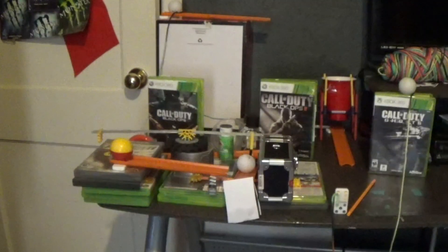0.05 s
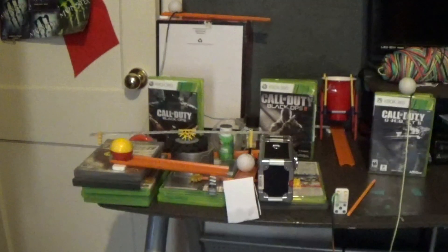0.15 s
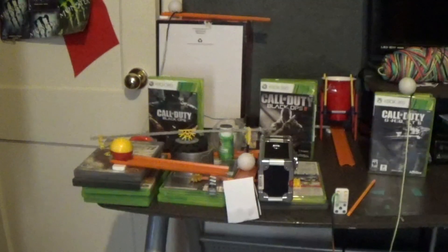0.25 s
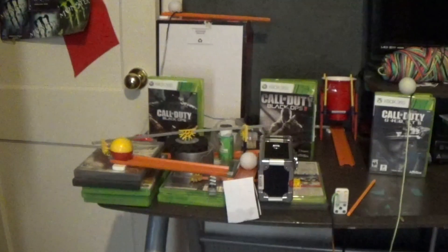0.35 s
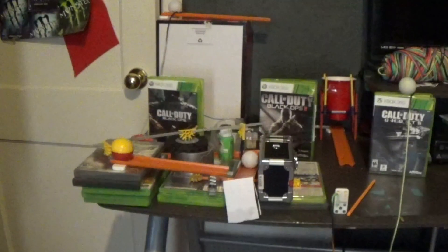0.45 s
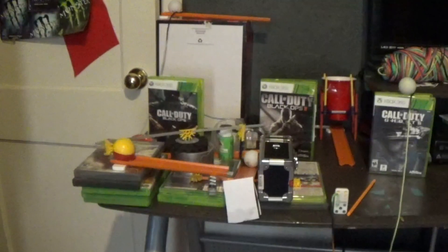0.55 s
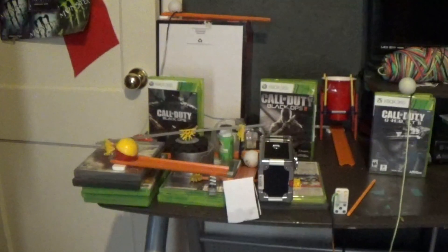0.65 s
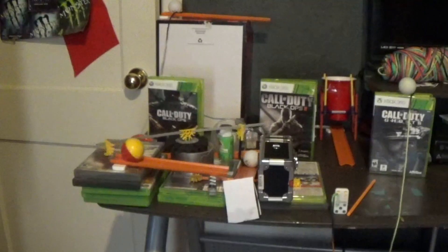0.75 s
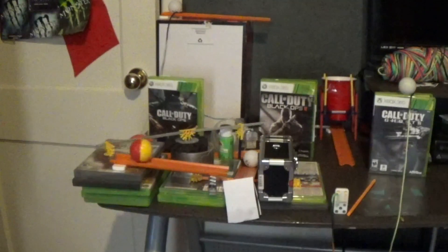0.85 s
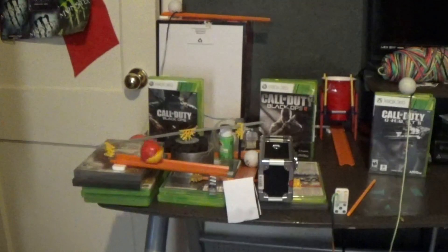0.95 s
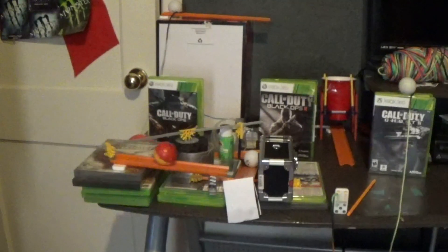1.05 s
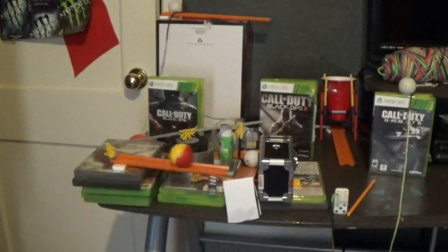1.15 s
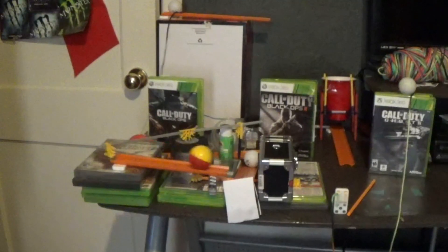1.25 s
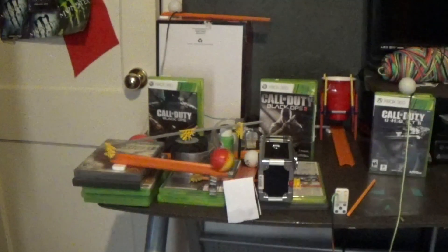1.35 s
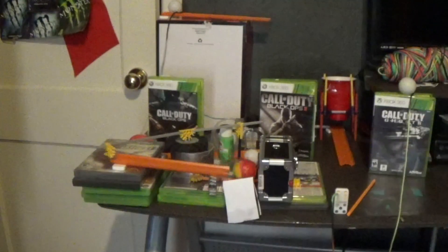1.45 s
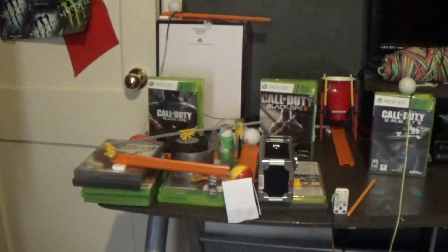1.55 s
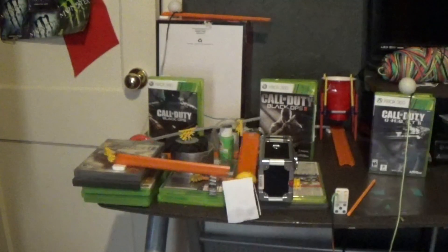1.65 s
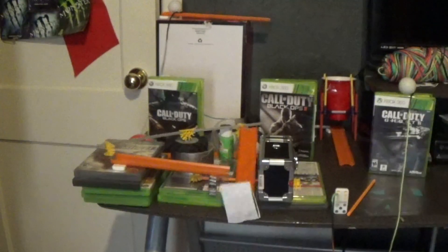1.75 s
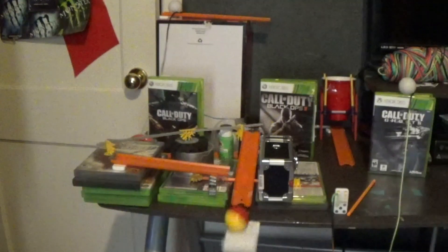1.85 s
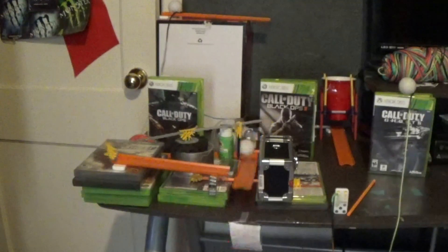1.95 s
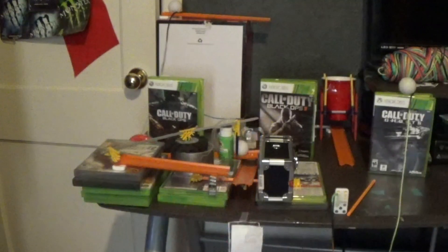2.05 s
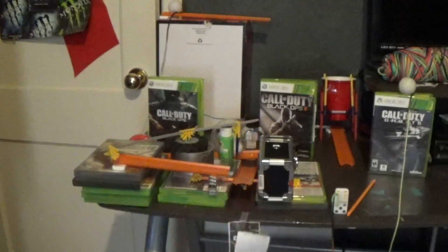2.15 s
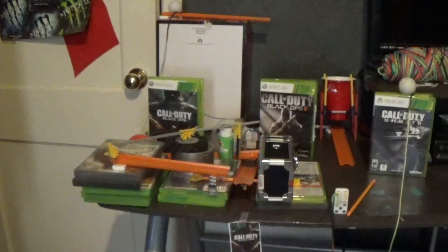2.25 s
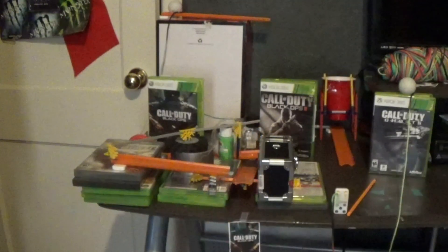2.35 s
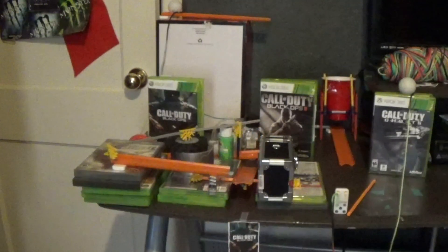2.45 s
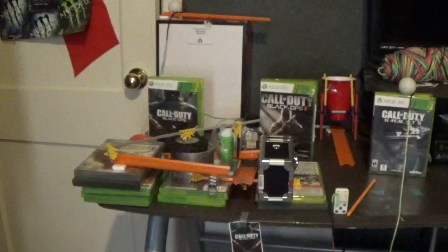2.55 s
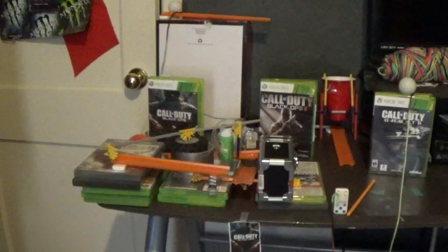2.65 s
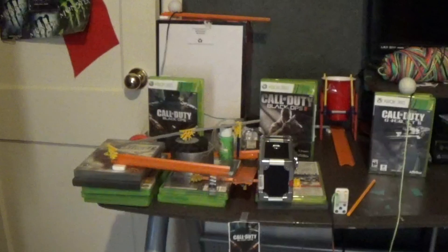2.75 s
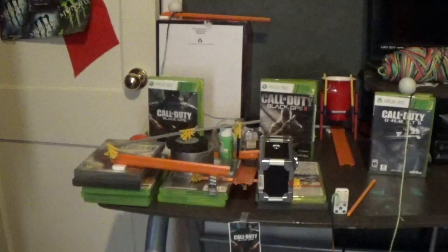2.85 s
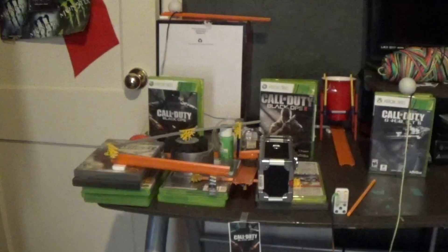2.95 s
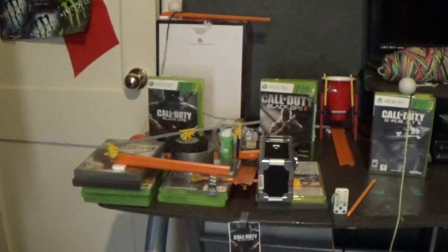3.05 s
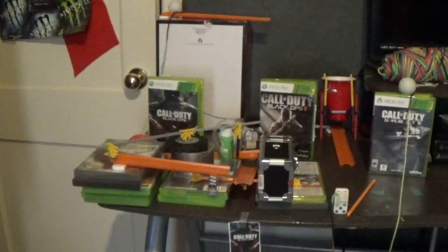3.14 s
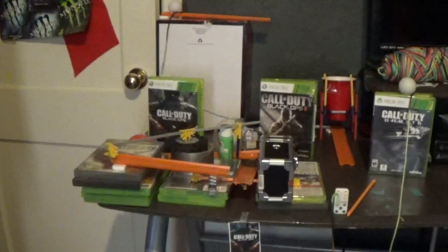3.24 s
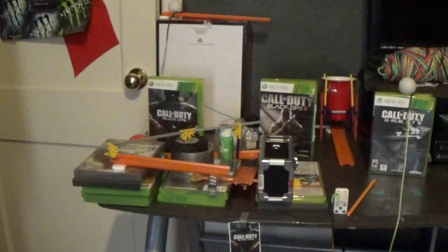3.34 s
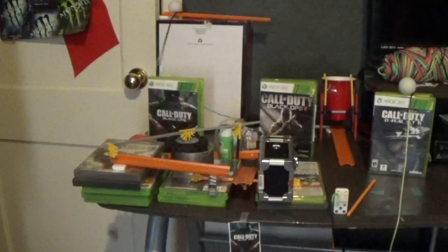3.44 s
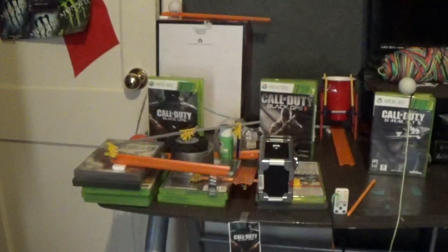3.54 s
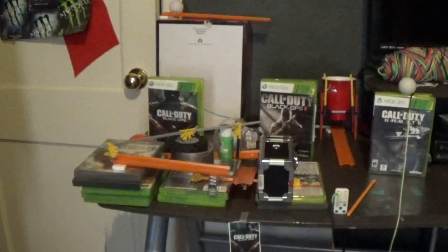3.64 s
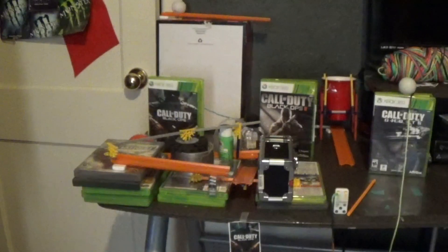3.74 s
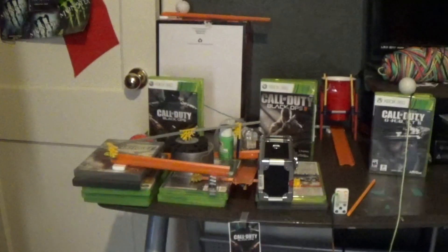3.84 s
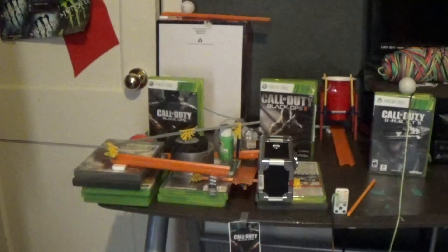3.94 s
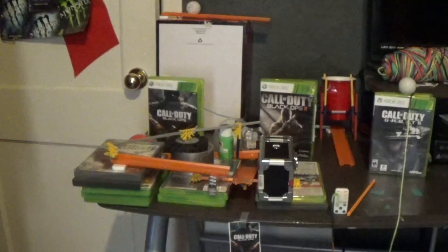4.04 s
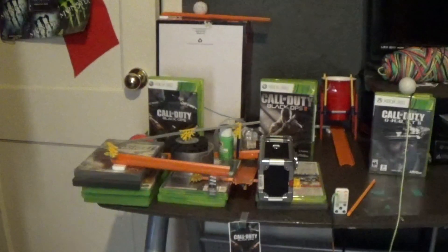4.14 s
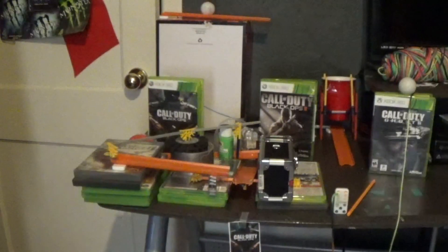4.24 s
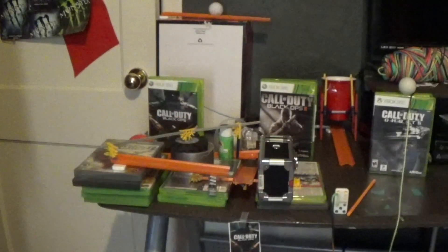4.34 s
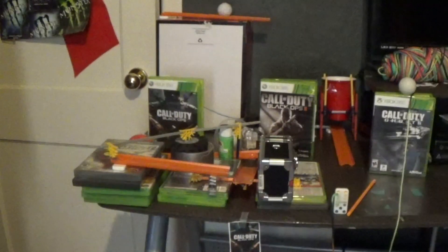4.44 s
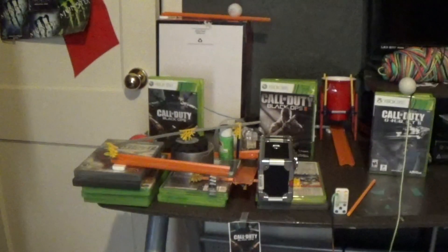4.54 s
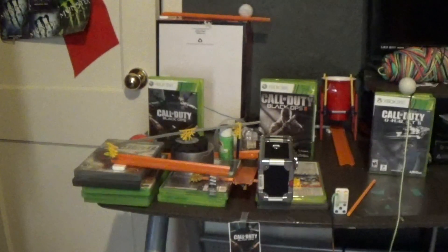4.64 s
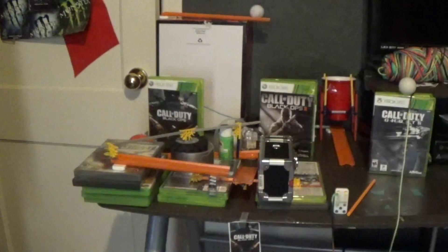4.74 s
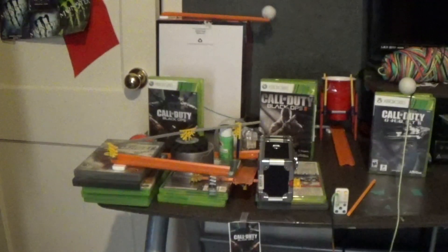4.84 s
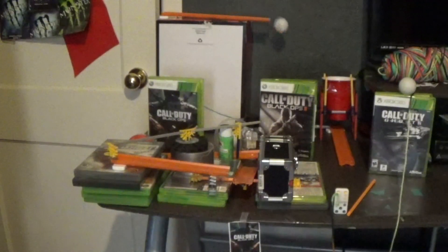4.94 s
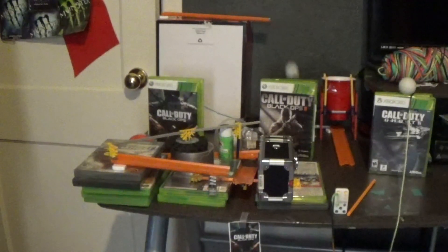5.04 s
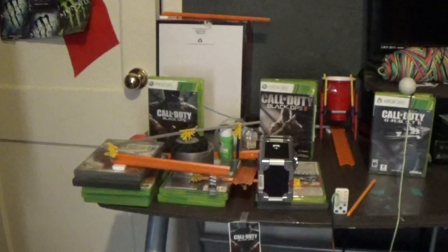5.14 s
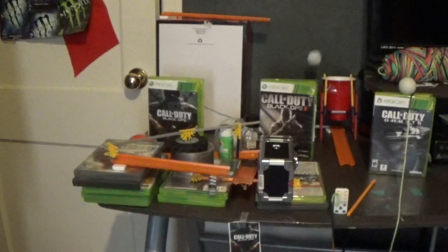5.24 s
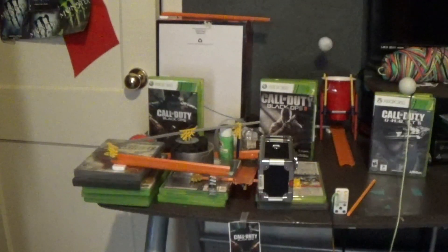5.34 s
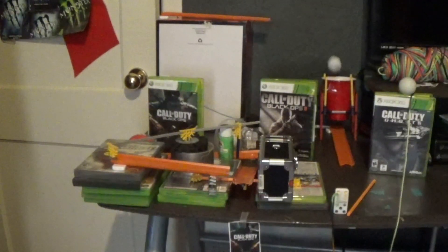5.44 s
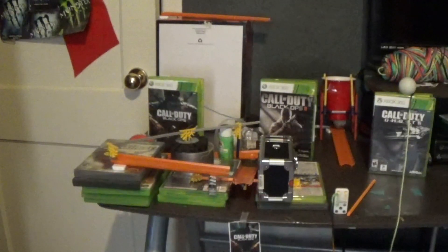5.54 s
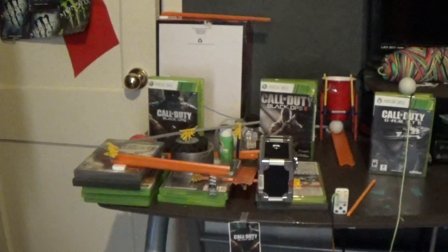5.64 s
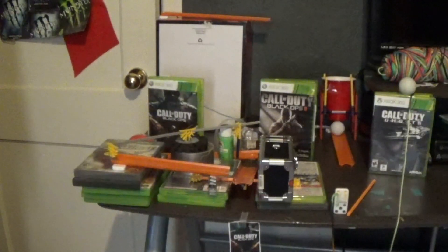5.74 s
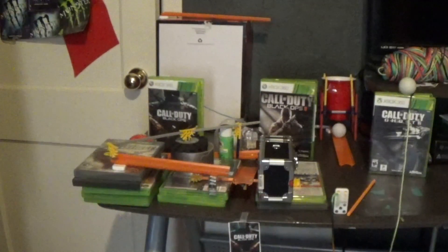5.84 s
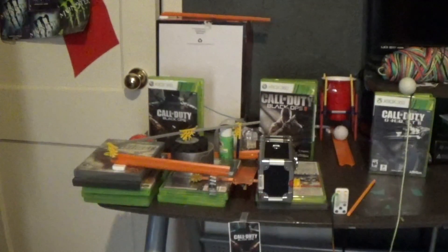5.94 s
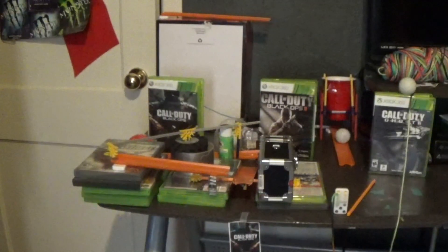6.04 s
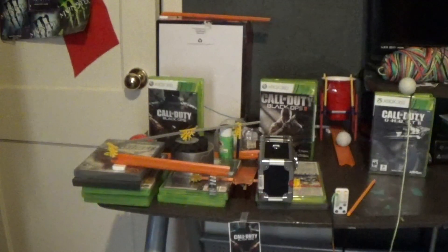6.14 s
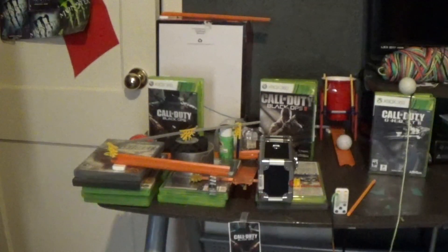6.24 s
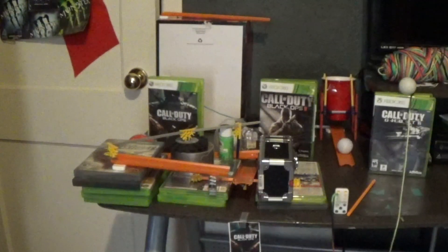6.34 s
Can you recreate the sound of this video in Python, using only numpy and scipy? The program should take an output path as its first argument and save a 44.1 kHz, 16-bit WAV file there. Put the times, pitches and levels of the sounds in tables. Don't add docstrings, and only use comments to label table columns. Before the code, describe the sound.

Heard by a small stereo camera a little way off, with short room echoes: tiny rolling clicks, a bright tick, then a dense clatter of balls and toppling plastic track. A flat case hits the floor with a boxy smack and two softer bounces. A quiet hollow rattle speeds up and fades before a dull weight drop. After a long lull, a light ball raps inside a cup and lands on plastic, over low fan noise.

```python
import sys
import numpy as np
from scipy import signal
from scipy.fft import rfft, irfft, next_fast_len
from scipy.io import wavfile
from scipy.ndimage import uniform_filter1d

SR = 44100
rng = np.random.default_rng(int(sys.argv[2]) if len(sys.argv) > 2 else 0)


def log_audio(samples):
    frames = np.atleast_2d(samples).T
    limited = np.clip(frames, -1, 1)
    pcm = np.round(limited * 32767).astype(np.int16)
    wavfile.write(sys.argv[1], SR, pcm)


def volts_from_db(level):
    exponent = np.asarray(level, float) / 20
    return 10 ** exponent


N = 281799

# start in seconds, peak level in dB, ringing spot in Hz, tilt in dB per octave.
ROD_BLOWS = [
    (0.4372, -14.5, 5760, 6.5),
    (0.4400, -24, 4680, 0),
    (0.4570, -25, 5500, -1.5),
]
# start in seconds, peak in dB, tilt in dB per octave.
ROLL_BLOWS = [(0.0359, -40.5, -5), (0.0818, -46, 2), (0.11, -47, 7), (0.141, -47, 6), (0.161, -41.5, 14),
              (0.199, -47, 3), (0.2244, -44, 7), (0.246, -54, 1), (0.2748, -37, 15), (0.288, -40.5, 18),
              (0.308, -46, 2), (0.354, -47, 8)]
# start in seconds, peak in dB, ringing spot in Hz, tilt in dB per octave.
STOP_BLOWS = [
    (0.5805, -24, 9100, 1),
    (0.5994, -43, 4100, -1),
    (0.6439, -43, 9130, 0),
]
# start in seconds, peak in dB, ringing spot in Hz, tilt in dB per octave.
BUMP_BLOWS = [
    (1.473, -3, 8800, -4),
    (1.4794, -24, 7900, -11),
    (1.5469, -16, 2550, -6),
    (1.5577, -17, 5270, 1),
    (1.5875, -18, 2300, -8),
    (1.4765, -7, 5700, -2),
    (1.6015, -24, 9500, -4),
    (1.648, -34, 9800, -7),
]
# start in seconds, peak in dB, ringing spot in Hz, tilt in dB per octave.
KNOCK_BLOWS = [
    (1.4915, -13, 1110, 0.5),
    (1.4945, -10.5, 1410, -0.5),
    (1.828, -17, 1150, -1.5),
    (1.8298, -14.5, 1340, -2),
    (1.8375, -19, 1480, -2),
    (1.846, -19, 940, -2),
    (1.852, -18, 800, -1),
    (1.866, -24, 900, -2),
]
# start in seconds, peak in dB, ringing spot in Hz, tilt in dB per octave.
TRACK_BLOWS = [(1.6045, -15, 1630, 2), (1.6125, -25, 2700, 4), (1.62, -27, 3000, 0),
               (1.629, -22, 2500, 2.5), (1.6384, -19.5, 980, 0), (1.716, -23, 3900, -0.5),
               (1.733, -17, 2260, 3), (1.6857, -18.5, 8900, 6.5), (1.698, -4, 4300, 8.5),
               (1.7055, -15.5, 3320, -0.5), (1.723, -18.5, 4020, -4.5), (1.7385, -21, 3900, 2),
               (1.7605, -22.5, 1810, -1), (1.916, -29, 3970, 1), (1.925, -25.5, 2310, 0),
               (1.94, -40, 3500, -7), (1.9583, -28, 1970, 12)]
# start in seconds, peak in dB, spot in Hz, tilt in dB per octave.
TICK_BLOWS = [(1.7045, -12, 9000, 1), (1.711, -18, 9000, 1), (1.761, -19, 8800, -1.5),
              (1.770, -32, 9500, 3), (1.821, -32, 9800, 0), (1.8265, -29, 5000, -3), (1.831, -30, 8800, -1),
              (1.889, -32, 9600, 3), (2.003, -26, 9800, 4), (2.0145, -27, 9200, 2), (2.029, -24, 9500, 4),
              (2.048, -30, 9300, 4), (2.133, -27, 4600, -6), (2.154, -37, 9500, -1)]
# start in seconds, peak in dB, ringing spot in Hz, tilt in dB per octave.
FLAP_BLOWS = [
    (1.9992, -4.5, 4340, 5),
    (2.0018, -14.5, 1780, -0.5),
    (2.0135, -20, 2300, 0),
    (2.029, -21, 2010, 0),
    (2.0965, -22, 3900, -1.5),
    (2.0914, -17.5, 4050, 5.5),
    (2.1315, -36, 1620, 4),
    (2.145, -32, 1730, -2),
]
# start in seconds, peak in dB, ringing spot in Hz, tilt in dB per octave.
CASE_BLOWS = [(2.244, -5.5, 407, -1), (2.253, -8.5, 418, -2.5), (2.2595, -5, 660, -2),
              (2.2625, -11, 710, 3.5), (2.267, -10, 724, 0.5), (2.275, -17, 730, -2.5),
              (2.2855, -12, 460, -0.5), (2.2975, -11.5, 630, -4), (2.315, -21, 607, -2),
              (2.328, -29, 500, 4), (2.3475, -19.5, 544, -1)]
# start in seconds, peak in dB, ringing spot in Hz, tilt in dB per octave.
CORNER_BLOWS = [
    (2.2418, -18, 5000, -5.5),
    (2.2434, -3, 3500, -3),
]
# start in seconds, peak in dB, ringing spot in Hz, tilt in dB per octave.
BOUNCE_BLOWS = [
    (2.6015, -15, 295, 3.5),
    (2.603, -16.5, 305, -4.5),
    (2.612, -20.5, 404, 2.5),
    (2.7925, -22, 296, 3),
]
# start in seconds, peak in dB, ringing spot in Hz.
RATTLE_BLOWS = [(3.052, -58, 1330), (3.109, -31.5, 1190), (3.150, -33.5, 1150), (3.165, -43, 1120),
                (3.2035, -30, 1130), (3.243, -30.5, 1160), (3.259, -42, 1120), (3.278, -33, 1090),
                (3.312, -33, 1780), (3.339, -35.5, 1120), (3.3662, -36.5, 1700), (3.391, -37, 1800),
                (3.411, -38, 1150), (3.43, -38, 1150), (3.448, -39.5, 1140), (3.464, -48, 1120),
                (3.478, -51, 1150)]
# start in seconds, peak in dB, ringing spot in Hz, tilt in dB per octave.
WEIGHT_BLOWS = [
    (3.6862, -4.5, 498, 5),
    (3.6875, -10.5, 520, 0),
    (3.699, -19, 546, -0.5),
    (3.722, -19, 600, 3.5),
    (3.759, -32, 670, -6),
    (3.958, -27, 393, 5.5),
]
# start in seconds, peak in dB, ringing spot in Hz, tilt in dB per octave.
CUP_BLOWS = [
    (5.1577, -8, 3140, 2.5),
    (5.1595, -3.5, 580, 0.5),
    (5.1625, -21, 8700, 1),
    (5.1653, -1.5, 8600, 3.5),
    (5.1715, -12.5, 8300, -1),
    (5.179, -12, 1090, 3),
    (5.192, -5.5, 1500, 0),
    (5.196, -27, 1310, -1.5),
    (5.2035, -20, 3500, -0.5),
]
# start in seconds, peak in dB, ringing spot in Hz, tilt in dB per octave.
RIM_BLOWS = [
    (5.5521, -22.5, 4330, 4.5),
    (5.5864, -25.5, 10100, 10),
    (5.5885, -26, 3670, 2),
    (5.593, -31, 6900, 8),
]
# start in seconds, peak in dB, ringing spot in Hz, tilt in dB per octave.
RAMP_BLOWS = [(5.6008, -6, 3500, 3), (5.6032, -10, 3150, 1), (5.6075, -19, 3330, 3),
              (5.6135, -9, 1500, 1.5), (5.6185, -14, 1510, -0.5), (5.6245, -10.5, 3700, 0),
              (5.628, -10.5, 8800, 2), (5.6394, -13.5, 3720, 0.5), (5.65, -12.5, 3250, 0.5),
              (5.676, -21, 3000, -2.5), (5.6604, -15, 3500, -2.5)]

# frequency in Hz, density in dB per Hz.
ROD_COLOUR = [(180, -53), (300, -28), (624, -22), (705, -16), (886, -2), (2280, -7), (2700, -2),
              (4820, 0.5), (10200, -10), (11500, -15), (15000, -55), (22000, -120)]
ROLL_COLOUR = [(590, -33), (1000, -10), (1360, 2), (3370, -3), (4060, 2), (7720, -8), (9000, -2.5),
               (10700, 1), (11500, 0), (15000, -53), (22000, -120)]
BUMP_COLOUR = [(180, -54.5), (300, -36), (4010, -3), (4400, 1), (5050, -4.5), (5880, 0), (7060, -2.5),
               (9430, 1), (11500, -5.5), (15000, -41), (22000, -120)]
KNOCK_COLOUR = [(59, -57), (100, -31.5), (686, -3.5), (853, -8), (924, -5.5), (1900, -12.5), (2700, -27),
                (9620, -47), (10800, -46), (11500, -65), (15000, -97), (22000, -120)]
TRACK_COLOUR = [(120, -47), (200, -11), (381, 5), (1150, 6), (2770, 5), (3950, 3.5), (6570, -10.5),
                (9070, -8.5), (10900, -14), (11500, -20), (15000, -89), (22000, -120)]
FLAP_COLOUR = [(120, -51), (200, -8), (401, -1), (475, -4.5), (1090, 6), (1270, -7), (1380, 4.5),
               (4160, -5.5), (7530, -16), (9540, -17.5), (11500, -17), (15000, -61), (22000, -120)]
CASE_COLOUR = [(18, -67), (30, -37), (155, -13), (231, 0.5), (344, 1.5), (657, -0.5), (931, -4.5),
               (1080, -18), (1820, -18), (2930, -16.5), (5060, -21), (9420, -43), (11500, -56),
               (15000, -88), (22000, -120)]
BOUNCE_COLOUR = [(18, -67), (30, -33), (148, -19.5), (225, 2.5), (399, -2), (595, -14.5), (760, -21.5),
                 (1250, -21.5), (3000, -33), (9190, -69.5), (11500, -68), (15000, -85), (22000, -120)]
RATTLE_COLOUR = [(120, -59), (200, -18), (225, -12), (262, -4), (1130, 7.5), (2300, -12.5), (2910, -12),
                 (6570, -25), (10400, -15), (11500, -11), (15000, -73), (22000, -120)]
WEIGHT_COLOUR = [(18, -78), (30, -40), (110, -30), (243, -7), (335, 1.5), (674, -3.5), (908, -7.5),
                 (1110, -15.5), (1350, -16), (3070, -25), (3660, -29.5), (9900, -48.5), (11500, -53),
                 (15000, -73), (22000, -120)]
CUP_COLOUR = [(59, -70.5), (100, -25), (230, -25), (310, -7), (371, -15.5), (597, -11), (1680, -6.5),
              (2540, -19.5), (3430, -19.5), (5970, -34), (8540, -22), (10400, -14.5), (11500, -47),
              (15000, -87), (22000, -120)]
RIM_COLOUR = [(180, -35), (300, 2), (1730, -5), (2110, -13), (2700, -1), (4400, -3.5), (5120, -8),
              (10300, -14.5), (11500, -25), (15000, -59), (22000, -120)]
RAMP_COLOUR = [(59, -61), (100, -31), (609, -6), (804, -11.5), (1490, -6), (2440, -7), (3780, -3),
               (7280, -17.5), (8540, -7.5), (10200, -12), (11500, -16), (15000, -83), (22000, -120)]

# frequency in Hz, width in Hz, lift in dB.
ROD_SHELL = [(2850, 300, 4), (4780, 60, 10)]
ROLL_SHELL = [(8900, 420, 7), (10200, 330, 7.2)]
CASE_SHELL = [(242, 18, 5.1), (492, 29, 4.3), (660, 22, 1.5), (870, 50, 1.8), (1150, 150, 2)]
BALL_SHELL = [(1150, 88, 1), (1700, 360, 9.5), (2960, 840, 13), (4400, 310, 12), (5750, 390, 12),
              (8700, 500, 6.5), (8730, 660, 15.5), (9100, 150, 4), (10230, 300, 19.5)]
CUP_SHELL = [(630, 110, 7.9), (1360, 180, 2.9), (3500, 480, 6.9), (5170, 450, 9.5), (8490, 690, 16.3),
             (9860, 860, 6)]

# frequency in Hz, time in seconds.
ROOM_T60 = [(125, 0.22), (400, 0.41), (1000, 0.36), (2800, 0.36), (7000, 0.41), (11000, 0.18)]
# frequency in Hz, side level in dB.
ROOM_SIDE = [(100, -12), (400, -8.5), (1500, -10), (5000, -10), (11000, -16)]
# frequency in Hz, level in dB.
ROOM_COLOUR = [(100, -9), (250, 2.5), (700, 6), (2000, 4), (5000, 0), (11000, -4)]
# start in seconds, peak in dB.
SHAKE_BLOWS = [
    (1.495, -60),
    (1.70, -61),
    (1.83, -60),
    (2.0, -60),
    (2.245, -40),
    (2.6, -55),
    (3.687, -59),
    (5.16, -58),
    (5.6, -60),
]
# start in seconds, peak in dB.
BOOM_BLOWS = [
    (1.72, -50),
    (2.245, -40),
    (2.6, -42.5),
    (3.687, -41.5),
    (3.93, -50),
    (5.16, -44.5),
]
# frequency in Hz, density in dB per Hz.
FAN_COLOUR = [(25, -39), (60, -22), (90, -21), (140, -17), (200, -8.5), (270, -4.5), (450, -2), (840, -7.5),
              (1200, -12), (3000, -18), (6000, -25), (11000, -117)]
# frequency in Hz, side minus middle in dB.
FAN_SIDE = [(60, -35), (110, -13), (190, -21), (350, -21.5), (620, -14.5), (1110, -8.5), (2000, -6),
            (3580, -6.5), (6430, -3.5), (11500, -8)]
# time in seconds, level in dB.
FAN_SWELL = [(0, -1), (1.2, -2.5), (2.9, 0.7), (4.2, -0.9), (5, -1.6), (6.39, -1)]
# frequency in Hz, density in dB per Hz.
HISS_COLOUR = [(1500, -32), (4000, -3), (8000, -3), (11000, -4)]
# time in seconds, level in dB.
HISS_SWELL = [(0, -56), (.6, -59), (.75, -58.5), (1.4, -58), (1.6, -47.5), (2.5, -52.5), (4.4, -53.5),
              (5.4, -54.5), (6.39, -53.5)]

ROLL_SPOT_HZ, RATTLE_TILT_DB = 9050, 1.7
SPOT_SHARE = 0.11
SPOT_REF_DB = -15
SHELL_SCATTER = 8
ROOM_FILL_S, ECHO_SPREAD_DB, ROOM_DELAY_S = .03, 4, .003
EARLY_DB, EARLY_S = 3.5, 0.035
WALL_S, FAR_WALL_S = .007, .018
SHAKE_HZ, SHAKE_RISE_S, SHAKE_T60_S, SHAKE_LEFT_DB = 30, .003, 0.18, -1
BOOM_HZ, BOOM_RISE_S, BOOM_T60_S, BOOM_LEFT_DB = 128.4, 0.042, 0.49, -1
FAN_DB, HUM_HZ, HUM_DB = -47, 91.5, -66.0
TOP_HZ = 10964


def struck(blows, colour, shell=(), crack_s=0.0031, tick_db=-0.77, room_db=3.0, spot_db=6.0, soft=.1,
           veil=0.05, wall_db=-17.0, crack_db=-18.5, wander=0.0081, left_db=0.0, far_wall_db=-6.0):
    start = int(min(blows)[0] * SR)
    t = np.arange(1024) / SR
    near, far = np.zeros((2, int(max(blows)[0] * SR) - start + 2048))
    cracks = rng.standard_normal((len(blows), 1024))
    for (s, peak_db, spot_hz, tilt_db), noise in zip(blows, cracks):
        turned = []
        for (hz, width, shell_db), a, b in zip(shell, noise[-16:], noise[-32:]):
            turned.append((hz * (1 + wander * a), width, shell_db * (1 + SHELL_SCATTER * wander * b)))
        crack = noise * volts_from_db(crack_db) * np.exp(-t / crack_s)
        crack[0] = 1
        softness_db = SPOT_REF_DB - peak_db
        lift_db = spot_db + soft * softness_db
        spot_width = SPOT_SHARE * spot_hz
        tick = click(colour, [*turned, (spot_hz, spot_width, lift_db)], tilt_db + tick_db)
        body = click(colour, [*turned, (spot_hz, spot_width, lift_db / 2)], tilt_db)
        at = int(s * SR) - start
        near[at:at + 2047] += volts_from_db(peak_db) * signal.fftconvolve(tick, crack)
        far[at:at + 1024] += volts_from_db(peak_db + room_db + veil * softness_db) * body
    heard = signal.fftconvolve(far[None], room(wall_db, far_wall_db), axes=1)
    heard[:, :len(near)] += near
    heard = heard * volts_from_db(np.array([[left_db / 2], [-left_db / 2]]))
    return np.pad(heard, ((0, 0), (start, N)))[:, :N]


def click(colour, shell, tilt_db, size=2048):
    hz = np.fft.rfftfreq(size, 1 / SR)
    db = read(colour, hz) + tilt_db * np.log2(np.clip(hz, 200., 11000.) / 1500.)
    for f, width, lift_db in shell:
        db = db + lift_db / (1 + (2 * (hz - f) / width) ** 2)
    cepstrum = irfft(np.log(volts_from_db(np.maximum(db, db.max() - 70))))
    cepstrum[1:size // 2] *= 2
    cepstrum[size // 2 + 1:] = 0
    out = irfft(np.exp(rfft(cepstrum)))[:size // 2]
    return out / np.abs(out).max()


def read(table, hz):
    f, value = np.transpose(table)
    return np.interp(np.log(np.maximum(hz, 1.)), np.log(f), value)


def room(wall_db, far_wall_db, size=32768):
    sample = np.arange(size)
    t = sample / SR
    hz = np.fft.rfftfreq(size, 1 / SR)
    noise, tail = mid_side(ROOM_SIDE, size), 0
    octave = np.log2(np.maximum(hz, 62.5) / 62.5)
    for k in range(9):
        band = irfft(noise * np.clip(1 - np.abs(octave - k), 0, 1))
        tail = tail + band * volts_from_db(-60 * t / read(ROOM_T60, 62.5 * 2 ** k))
    echoes = np.repeat(np.clip(rng.standard_normal(size // 32), -2, 2), 32)
    uneven_db = ECHO_SPREAD_DB * echoes * np.exp(-t / ROOM_FILL_S)
    early_db = EARLY_DB * np.exp(-t / EARLY_S)
    tail = tail * volts_from_db(uneven_db + early_db) * (t > ROOM_DELAY_S)
    spectrum = rfft(tail)
    broad = uniform_filter1d(np.mean(np.abs(spectrum) ** 2, axis=0), size=61)
    tail = irfft(spectrum * volts_from_db(read(ROOM_COLOUR, hz)) / np.sqrt(broad))
    tail = tail * (t > ROOM_DELAY_S) * (t < t[-1] / 2)
    tail = tail / np.sqrt(np.mean(np.sum(tail ** 2, axis=1)))
    wall = volts_from_db(wall_db) * (sample == int(WALL_S * SR))
    far_wall = volts_from_db(far_wall_db) * (sample == int(FAR_WALL_S * SR))
    return tail + wall + far_wall


def mid_side(side_table, size):
    mid, side = rfft(rng.standard_normal((2, size)))
    side = side * volts_from_db(read(side_table, np.fft.rfftfreq(size, 1 / SR)))
    return np.array([mid + side, mid - side])


def shake():
    support = wobble(SHAKE_BLOWS, SHAKE_HZ, SHAKE_RISE_S, SHAKE_T60_S, SHAKE_LEFT_DB)
    boom = wobble(BOOM_BLOWS, BOOM_HZ, BOOM_RISE_S, BOOM_T60_S, BOOM_LEFT_DB)
    return support + boom


def wobble(blows, hz, rise_s, t60_s, left_db):
    t, out = np.arange(N) / SR, 0
    for s, peak_db in blows:
        age = np.maximum(t - s, 0)
        swell = volts_from_db(peak_db - 60 * age / t60_s) * (1 - np.exp(-age / rise_s))
        out = out + swell * np.sin(2 * np.pi * hz * age)
    return out * volts_from_db(np.array([[left_db], [-left_db]]))


def fan():
    murmur = volts_from_db(FAN_DB) * steady(FAN_COLOUR, FAN_SWELL)
    hum = volts_from_db(HUM_DB) * np.sin(2 * np.pi * HUM_HZ * np.arange(N) / SR)
    return murmur + hum + steady(HISS_COLOUR, HISS_SWELL)


def steady(colour, swell):
    size = next_fast_len(N)
    gain = volts_from_db(read(colour, np.fft.rfftfreq(size, 1 / SR)))
    air = irfft(mid_side(FAN_SIDE, size) * gain, size)[:, :N]
    return air * volts_from_db(np.interp(np.arange(N) / SR, *np.transpose(swell))) / air.std()


def scene():
    roll_blows = [(s, db, ROLL_SPOT_HZ, tilt) for s, db, tilt in ROLL_BLOWS]
    roll = struck(roll_blows, ROLL_COLOUR, ROLL_SHELL, room_db=5.0, spot_db=13.0, soft=.1, veil=.1)
    rod = struck(ROD_BLOWS, ROD_COLOUR, ROD_SHELL, crack_s=0.00087, room_db=3.5, spot_db=9.0, soft=-0.1,
                 wall_db=-20.0, crack_db=-9.0, left_db=1.5)
    stop = struck(STOP_BLOWS, ROLL_COLOUR, ROLL_SHELL, room_db=-1.0, spot_db=6.0, soft=.3, veil=.1)
    bump = struck(BUMP_BLOWS, BUMP_COLOUR, crack_s=0.0065, room_db=2.0, spot_db=14.0, soft=0.1, veil=0.05,
                  left_db=1.0)
    knock = struck(KNOCK_BLOWS, KNOCK_COLOUR, crack_s=0.0035, tick_db=2.5, room_db=-3.0, spot_db=8.5,
                   soft=0.12, crack_db=-16.5)
    track = struck(TRACK_BLOWS, TRACK_COLOUR, crack_s=0.0021, room_db=0.5, spot_db=12.0, soft=0.63,
                   veil=0.087, crack_db=-17.5, left_db=0.7)
    tick = struck(TICK_BLOWS, ROLL_COLOUR, crack_s=.001, room_db=1.0, spot_db=13.5, soft=.05, crack_db=-12.5)
    flap = struck(FLAP_BLOWS, FLAP_COLOUR, crack_s=0.0029, tick_db=0.5, room_db=2.0, spot_db=11.5,
                  soft=0.045, crack_db=-13.5)
    corner = struck(CORNER_BLOWS, RIM_COLOUR, crack_s=.001, room_db=-3.0, spot_db=3.0, crack_db=-12.0,
                    left_db=-1.5)
    case = struck(CASE_BLOWS, CASE_COLOUR, CASE_SHELL, crack_s=0.0042, tick_db=0.5, room_db=-1.5,
                  spot_db=11.5, soft=.05, veil=0.033, left_db=-1.9)
    bounce = struck(BOUNCE_BLOWS, BOUNCE_COLOUR, crack_s=0.0021, tick_db=3.0, room_db=0.0, spot_db=2.0,
                    soft=0.37, veil=0.04, left_db=-0.5)
    rattle_blows = [(*row, RATTLE_TILT_DB) for row in RATTLE_BLOWS]
    rattle = struck(rattle_blows, RATTLE_COLOUR, BALL_SHELL, crack_s=.002, tick_db=-1.0, room_db=10.5,
                    spot_db=3.0, soft=.1, veil=.03, wall_db=-5.0, crack_db=-6.0, wander=.008, left_db=.3,
                    far_wall_db=-10.0)
    weight = struck(WEIGHT_BLOWS, WEIGHT_COLOUR, crack_s=0.0041, tick_db=-1.0, room_db=0.5, spot_db=7.5,
                    soft=0.2, veil=0.091, left_db=1.0)
    cup = struck(CUP_BLOWS, CUP_COLOUR, CUP_SHELL, crack_s=0.0025, room_db=2.5, spot_db=1.0, soft=0.16,
                 veil=0.3, left_db=-0.1)
    rim = struck(RIM_BLOWS, RIM_COLOUR, crack_s=0.0052, room_db=11.5, spot_db=15.5, soft=.1, crack_db=-7.5)
    ramp = struck(RAMP_BLOWS, RAMP_COLOUR, crack_s=0.0018, room_db=6.0, spot_db=8.0, soft=0.1, veil=0.13,
                  crack_db=-11.0, left_db=0.0)
    falling_track = bump + knock + track + tick + flap
    falling_case = corner + case + bounce
    last_ball = cup + rim + ramp
    return roll + rod + stop + falling_track + falling_case + rattle + weight + last_ball + shake() + fan()


def low_pass(x):
    return signal.sosfilt(signal.butter(12, 12130, fs=SR, output="sos"), x)


def record(dry):
    top_cut = signal.ellip(10, .3, 60, TOP_HZ, fs=SR, output="sos")
    cut = signal.sosfilt(top_cut, dry)
    leaning = cut * volts_from_db(np.array([[-.15], [.15]]))
    rounded = np.tanh(0.72 * leaning) / 0.95
    return low_pass(rounded)


dry = scene()
out = record(dry)
log_audio(out)
```